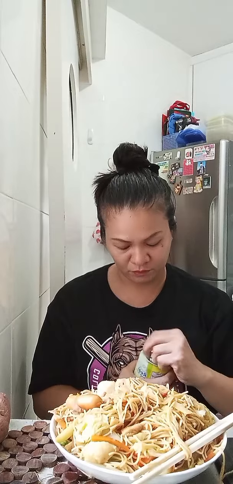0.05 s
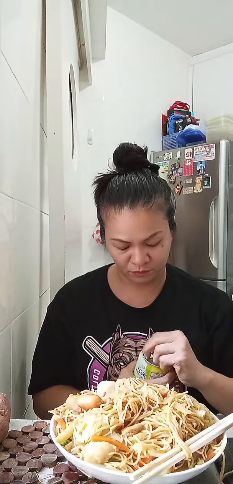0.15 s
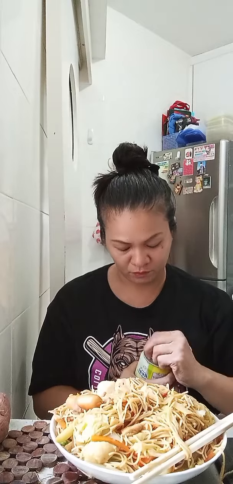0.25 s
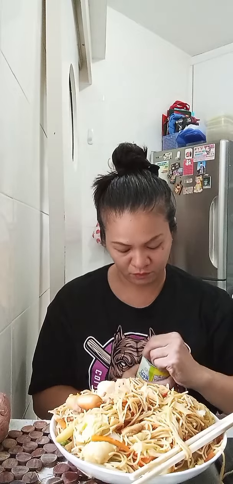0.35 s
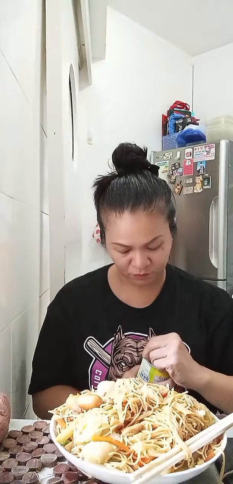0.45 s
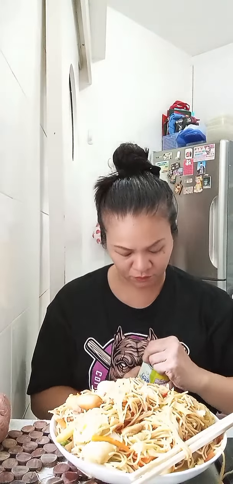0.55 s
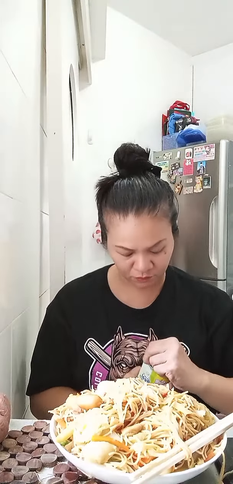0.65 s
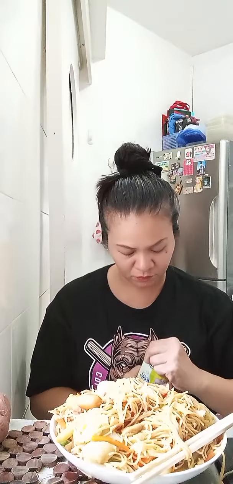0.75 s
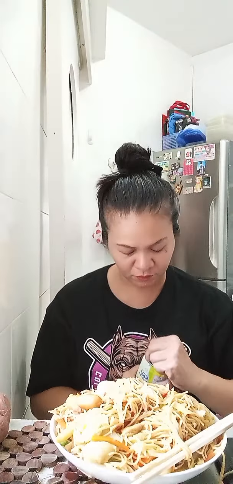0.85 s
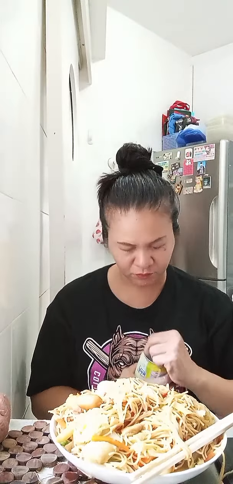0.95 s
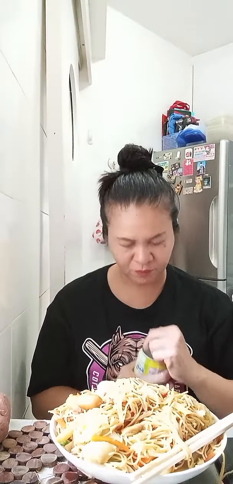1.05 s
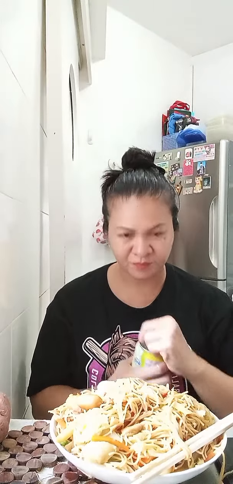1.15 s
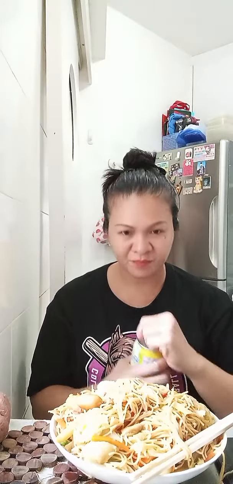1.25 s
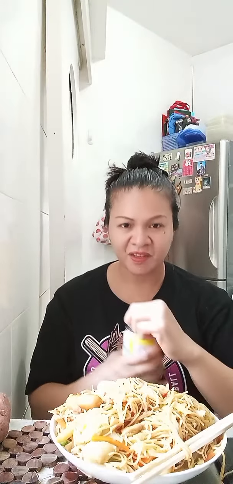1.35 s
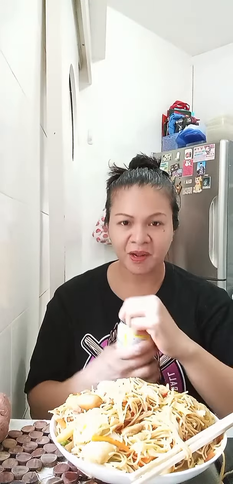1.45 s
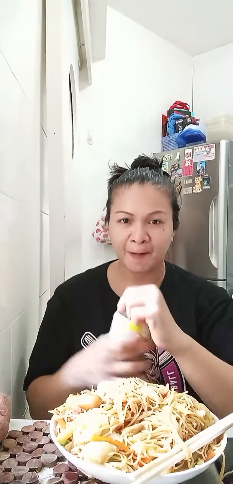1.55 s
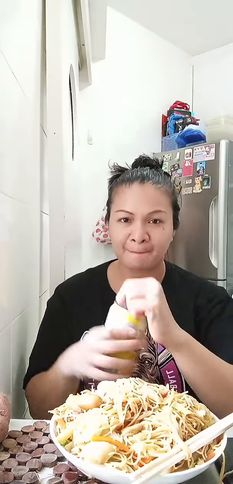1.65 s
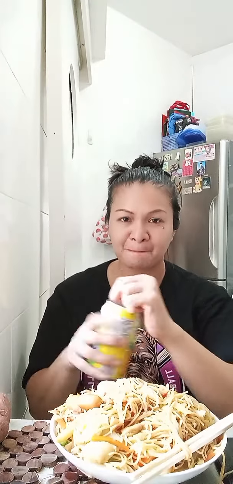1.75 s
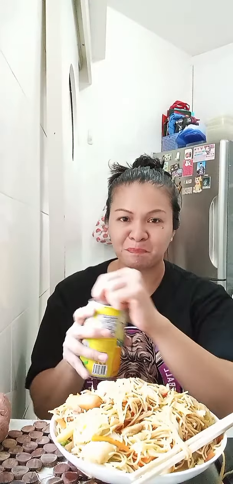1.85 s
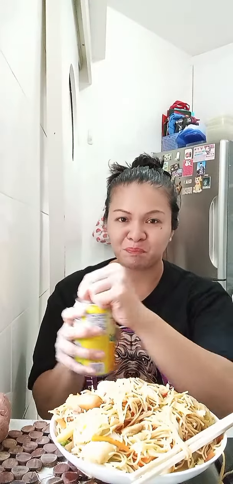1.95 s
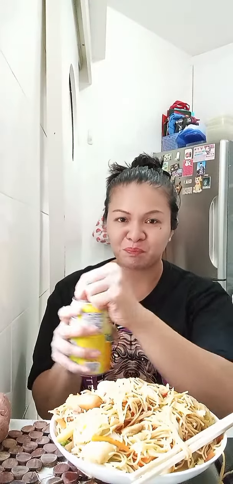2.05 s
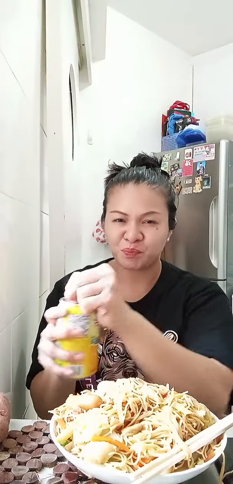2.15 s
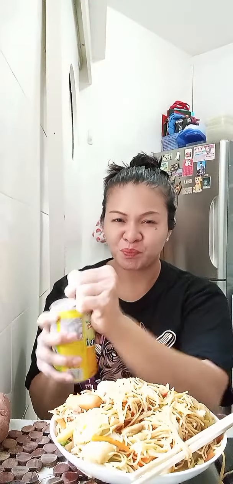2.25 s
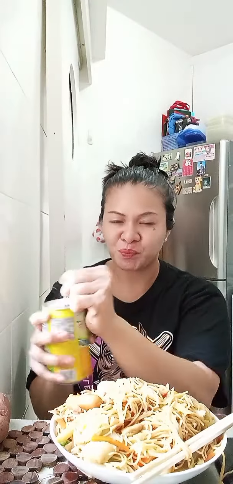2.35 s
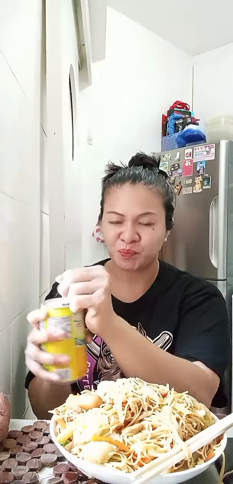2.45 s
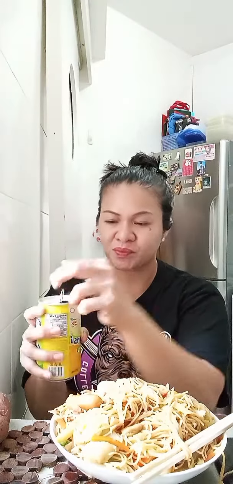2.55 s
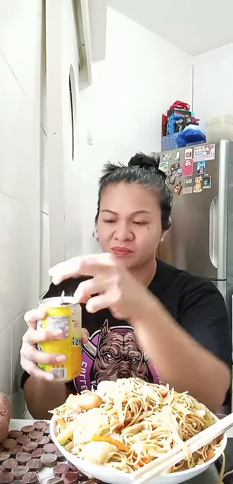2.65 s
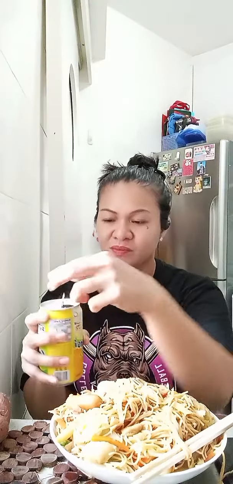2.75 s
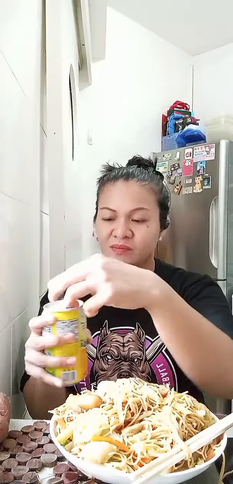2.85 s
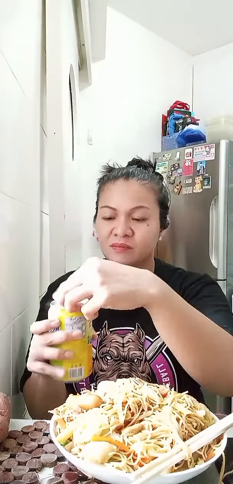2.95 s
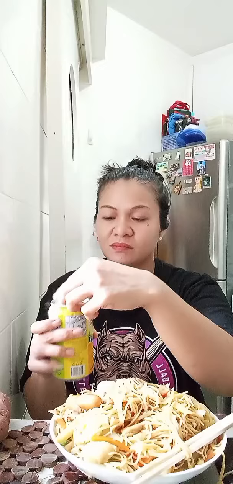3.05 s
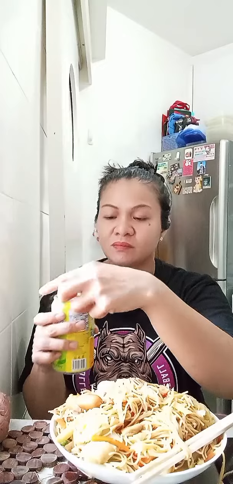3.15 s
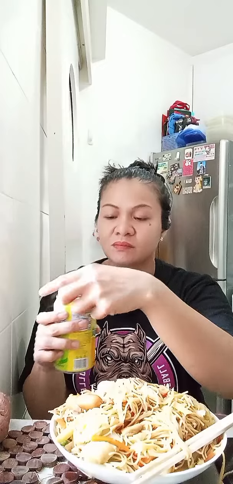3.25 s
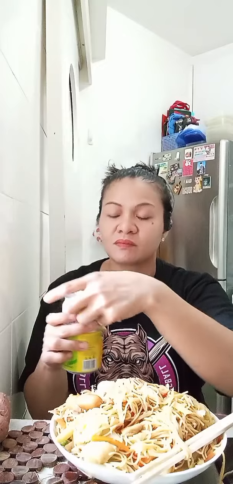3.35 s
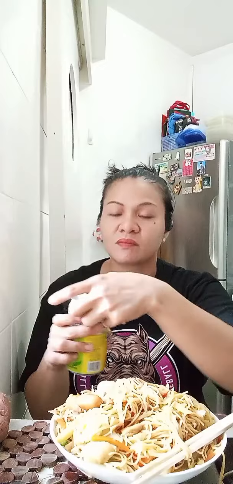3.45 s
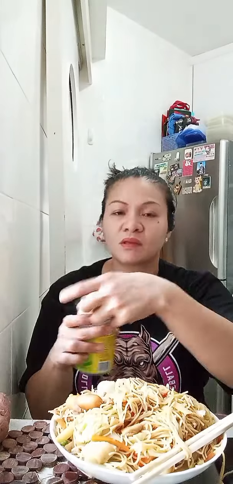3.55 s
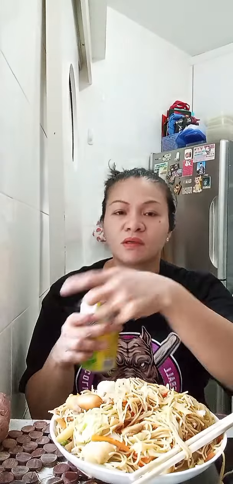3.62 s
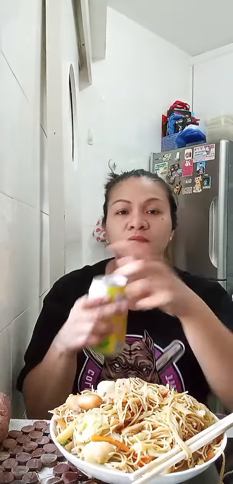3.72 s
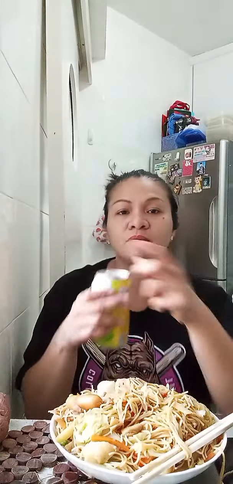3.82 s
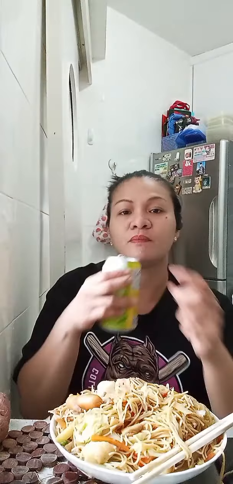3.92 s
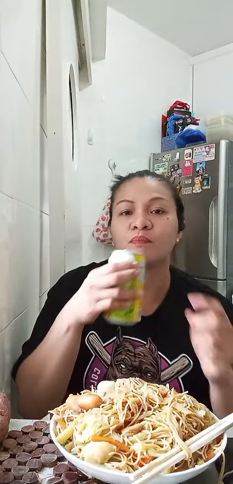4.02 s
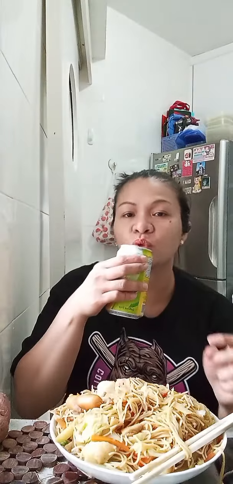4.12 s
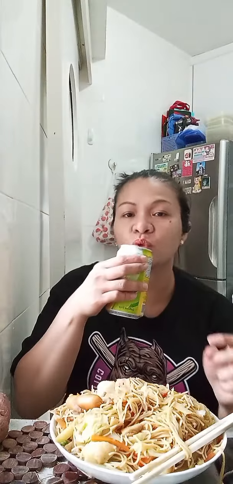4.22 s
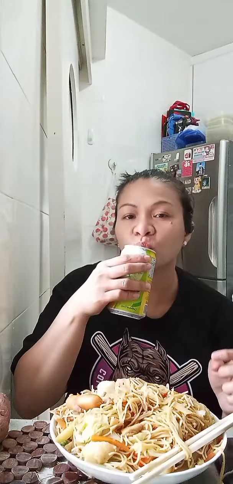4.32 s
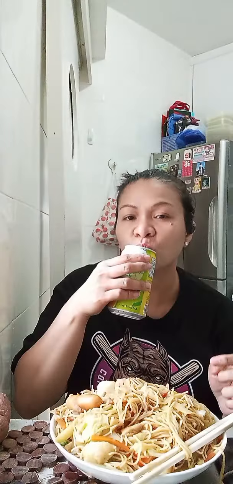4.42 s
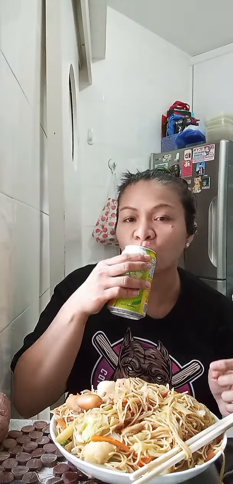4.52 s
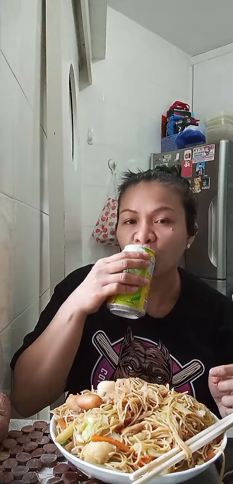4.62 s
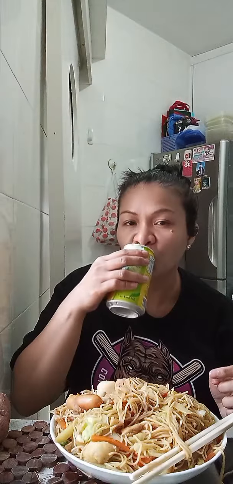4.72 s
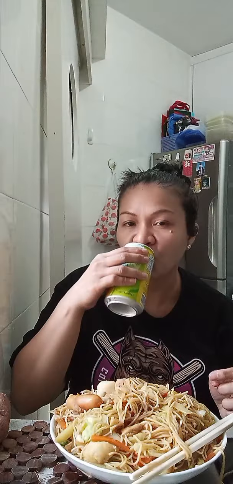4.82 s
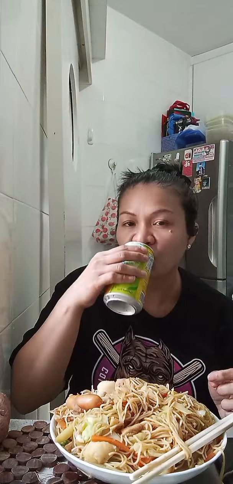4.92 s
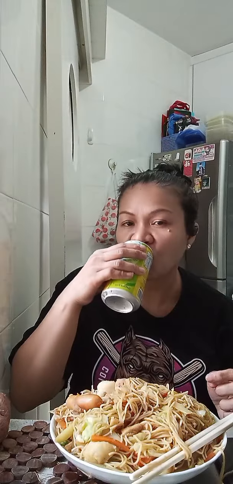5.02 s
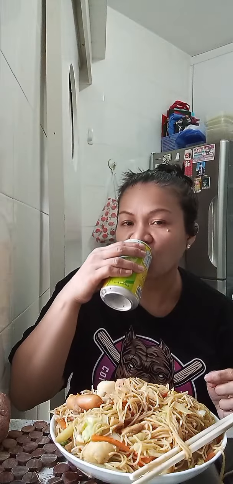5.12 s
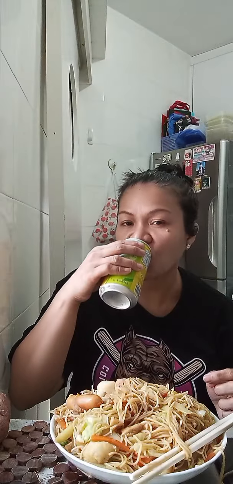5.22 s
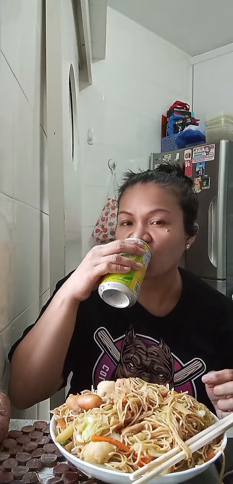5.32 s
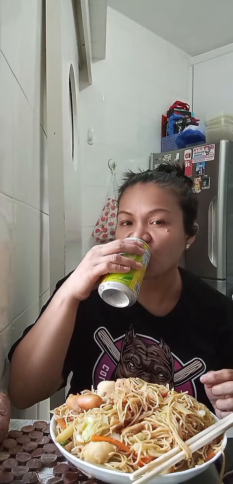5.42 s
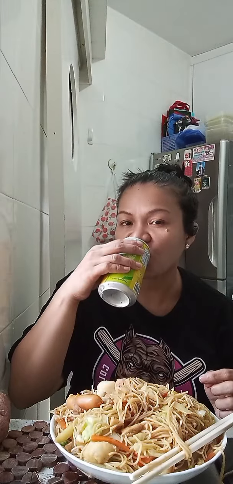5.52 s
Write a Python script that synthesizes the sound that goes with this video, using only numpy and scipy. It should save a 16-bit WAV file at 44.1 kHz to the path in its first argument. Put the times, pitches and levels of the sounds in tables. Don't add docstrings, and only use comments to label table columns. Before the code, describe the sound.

A pull-tab can opens close by: small crack and vent hiss, two sharp metal snaps, short gas spurt, tab click, then faint finger ticks.

```python
import sys
import numpy as np
from scipy import signal
from scipy.fft import rfft, irfft, next_fast_len
from scipy.io import wavfile
from scipy.ndimage import uniform_filter1d, map_coordinates

SR = 44100
rng = np.random.default_rng(int(sys.argv[2]) if len(sys.argv) > 2 else 0)


def magnitude_from_level(level_db):
    exponent = np.asarray(level_db, float) / 20
    return 10 ** exponent


def master_out(mix):
    frames = np.transpose(np.atleast_2d(mix))
    ceiling = np.clip(frames, -1, 1)
    pcm = np.round(ceiling * 32767).astype(np.int16)
    wavfile.write(sys.argv[1], SR, pcm)


N = 246078

# (time [s], blade pitch [Hz], blade tone level [dB])
FAN_TRACK = [(0.0, 96.5, -43), (0.12, 97.6, -49), (0.48, 97.6, -45), (0.64, 97.5, -55), (0.79, 97.7, -43),
             (1.26, 97.5, -51), (1.32, 97.6, -44), (2.08, 97.6, -47), (2.14, 97.5, -53), (2.27, 97.6, -41),
             (2.31, 97.7, -59), (2.38, 97.3, -48), (3.51, 99.0, -45), (3.65, 98.9, -49), (3.82, 98.9, -39),
             (3.87, 98.9, -44), (5.46, 98.9, -48), (5.58, 101.6, -45)]
# (multiple of blade pitch [1], level [dB])
BLADE_HARMONICS = [(1, -1), (2, -14.5), (3, -4.5), (4, -12), (5, -17), (6, -21)]
# (frequency [Hz], density [dB per Hz])
AIR_COLOUR = [(15, -51), (25, -26.5), (43, -30), (68, -15.5), (103, -4.5), (151, -6.5), (286, -6.5),
              (948, -18.5), (1290, -16.5), (2350, -34.5), (2940, -31), (3350, -34), (5000, -41),
              (6500, -68), (11000, -120)]
# (frequency [Hz], width [Hz], gain [dB])
HOUSING_BANDS = [(435, 20, 3.5), (808, 110, 8), (948, 110, -4), (1076, 88, 8), (1290, 97, 4),
                 (2000, 200, 7), (2934, 183, 13.5), (6020, 740, 9)]
AIR_DB = -43.5

# (time [s], length [s], level [dB])
STROKES = [
    (.08, .08, -71),
    (1.394, 0.11, -65.5),
    (3.08, .12, -67),
    (3.48, .14, -57.5),
    (3.665, 0.066, -62.5),
    (4.025, 0.056, -59.5),
    (4.9, 0.093, -63),
    (5.079, .07, -64),
    (5.199, 0.094, -67),
]
# (time [s], peak [dB], pitch [Hz])
NAIL_TICKS = [(.1416, -52, 4930), (.485, -62, 13040), (1.402, -58, 14500), (1.4222, -46, 13500),
              (1.4225, -48, 9800), (1.4465, -39.5, 7070), (1.5065, -47.5, 8000), (1.512, -47, 3150),
              (1.573, -53, 4300), (1.5798, -46, 4180), (1.581, -61, 10000), (2.59, -51, 6800),
              (3.08, -56, 7750), (3.609, -61, 9800), (3.642, -62, 14500), (3.745, -54, 14740),
              (4.163, -61, 14480), (5.2734, -42, 5000), (5.285, -48, 5400), (5.508, -50, 3780)]
# (time [s], peak [dB], pitch [Hz])
PAD_TICKS = [(.1, -60, 13000), (1.375, -61, 12000), (1.474, -58, 11010), (1.5045, -42, 3497),
             (1.5068, -48, 12400), (2.515, -53, 11940), (3.0674, -57, 8970), (3.4865, -48, 4500),
             (3.5418, -39, 3900), (3.543, -50, 8000), (3.5432, -57, 14000), (3.545, -42, 2500),
             (3.579, -56, 10000), (3.693, -54, 7000), (3.813, -62, 11000), (4.0287, -43, 6650),
             (4.96, -50, 4000), (5.11, -49.5, 4200), (5.2091, -47, 5200)]
NAIL_WIDTH, PAD_WIDTH = .21, .75
TICK_T60_S, TICK_HZ, DAMPING = .024, 5000, .6

# (time [s], level [dB])
SQUEAKS = [
    (.385, -61),
    (1.549, -54),
    (2.72, -64),
    (3.385, -61),
    (3.634, -56),
    (4.55, -56),
    (5.455, -55),
]
SQUEAK_S, SQUEAK_HZ, SQUEAK_SPREAD_HZ = .04, 7090, 40

# (opens [s], rise [s], peak [dB], hold [s], fall [dB per s], shut after [s])
VENT_FLOW = (.857, .016, -17.5, .026, 250, .16)
# (frequency [Hz], density [dB per Hz])
VENT_SPECTRUM = [(180, -64), (300, -26), (425, -8.5), (701, -18), (842, -13.5), (1560, -8), (1870, -7.5),
                 (2480, -12.5), (6300, -6.5), (7080, -3), (9550, -16), (14000, -11), (16000, -21.5)]
# (opens [s], rise [s], peak [dB], hold [s], fall [dB per s], shut after [s])
GAS_FLOW = (2.3, .003, -29, .085, 145, .215)
# (frequency [Hz], density [dB per Hz])
GAS_SPECTRUM = [(900, -38), (1500, -9), (2250, -2.5), (2600, -9.5), (3400, -8), (4800, -6), (6700, -3.5),
                (8300, -17), (10500, -23), (12300, -17), (14200, -19), (16000, -28)]
# (frequency [Hz], width [Hz], gain [dB])
SLIT_BANDS = [(3500, 250, 3), (4620, 300, 4), (5250, 230, 4), (7000, 340, 1), (8000, 400, 3)]
SPURT_DB, SPURT_S = 10, .018

# (time [s], peak [dB], rise [s], burst t60 [s], crack level [dB])
SNAP_EVENTS = [
    (2.2688, -4.5, .002, 0.075, -2),
    (2.3005, -5.5, .003, .045, 2.5),
    (2.3838, -2.5, 0.0013, .12, -1),
    (.859, -14, .004, .03, -17),
]
FREE_RING_S = [
    .021,
    .015,
    .135,
    .125,
    .051,
]
# (frequency [Hz], level [dB], t60 [s])
SEALED_MODES = [(1920, -2.5, 0.15), (2145, -5, 0.11), (3260, -6, .04), (4150, -4, .05), (4530, 3, 0.042),
                (5280, -3, 0.035), (5520, 4, 0.045), (6740, -6, 0.034), (8860, -11, .02), (14730, -9, .02)]
# (frequency [Hz], level [dB], t60 [s])
TORN_MODES = [(910, -2, .04), (1300, -14, .04), (2340, -16, .04), (3280, -16, .02), (4320, -16, .02),
              (5520, 2, 0.037), (6790, 3, 0.025), (12200, -6, .01), (14500, -8, .01)]
# (frequency [Hz], level [dB], t60 [s])
OPEN_MODES = [(332, -5.5, 0.13), (449, -5, .14), (654, -2, .22), (718, 0.5, 0.15), (851, -2, 0.18),
              (940, 1, 0.095), (1330, -1, 0.11), (1680, -2.5, 0.18), (1950, 0.5, 0.32), (2030, -3.5, 0.27),
              (2180, -6, 0.22), (3014, -5, 0.25), (3200, -5.5, 0.3), (3380, -8, 0.2)]
# (frequency [Hz], level [dB], t60 [s])
RIVET_MODES = [(326, -21, 0.053), (1660, -3.5, 0.078), (1816, -5.5, 0.27), (1910, -11, .15),
               (4570, 7, 0.04), (5400, -4, .06), (7000, 1, .08)]
# (frequency [Hz], density [dB per Hz])
SEALED_CRACK = [(350, -66.5), (600, -36), (1400, -9), (1980, -1), (2910, -17), (4050, -4), (5480, -6.5),
                (6120, -15), (6640, -16), (8270, -22), (14900, -25), (16000, -34)]
# (frequency [Hz], density [dB per Hz])
TEAR_CRACK = [(240, -64), (400, -34), (935, -1), (1330, -9), (2320, -2), (2970, -23), (5600, 2),
              (9470, -22), (13500, -16), (16000, -27)]
# (frequency [Hz], density [dB per Hz])
FOLD_CRACK = [(90, -53), (150, -25), (821, -3), (1530, -4.5), (1980, 0), (2600, -11), (3420, -7),
              (3840, -14), (7040, -15), (10000, -30), (13500, -25), (16000, -34)]

# (time [s], peak [dB], push [s])
POP_EVENTS = [
    (2.3188, -8, 0.00019),
]
# (frequency [Hz], level [dB], t60 [s])
CAVITY_MODES = [(802, -5, 0.48), (883, -1, 0.36), (969, -1, 0.33), (703, -6, .3), (1090, -3.5, 0.12),
                (1308, -6, 0.22)]

# (frequency [Hz], t60 [s])
KITCHEN_T60 = [(300, 0.31), (2000, 0.39), (6000, 0.36), (14000, 0.27)]
# (frequency [Hz], density [dB per Hz])
CAPSULE_COLOUR = [(2500, -11), (4200, -5.5), (4900, -1.5), (5400, -2), (6100, 5), (6600, 0), (7100, -1.5),
                  (8200, -13.5), (11000, -16), (12300, -16), (13200, -9), (15000, -15), (16000, -17)]


def unit(x):
    return x / np.sqrt(np.mean(x ** 2) + 1e-20)


def along(points, hz):
    f, v = np.transpose(points)
    return np.interp(np.log(hz + 1), np.log(f + 1), v)


def curves(rows):
    s, *cols = np.transpose(rows)
    return [np.interp(np.arange(N) / SR, s, c) for c in cols]


def wobble(rate_hz):
    knots = rng.standard_normal(int(N * rate_hz / SR) + 4)
    return map_coordinates(knots, [np.arange(N) * rate_hz / SR])


def filtered(x, response):
    m = next_fast_len(x.shape[-1] + SR // 2)
    spectrum = rfft(x, m) * response(np.fft.rfftfreq(m, 1 / SR))
    return irfft(spectrum, m)[..., :x.shape[-1]]


def resonance(f, hz, width_hz):
    return 1j * f * width_hz / (hz * hz - f * f + 1j * f * width_hz)


def bumps(bands, f):
    return sum(db / (1 + (2 * (f - hz) / width_hz) ** 2) for hz, width_hz, db in bands)


def burst(rise_s, t60_s, size):
    t = np.arange(size) / SR
    return np.clip(t / rise_s, 0, 1) * magnitude_from_level(-60 * t / t60_s) * rng.standard_normal(size)


def add(track, s, sound, db):
    track[round(s * SR):][:len(sound)] += magnitude_from_level(db) * sound / np.abs(sound).max()


def patchy(patchy_db):
    z = signal.stft(rng.standard_normal(N + 512), nperseg=512)[2]
    field = uniform_filter1d(rng.standard_normal(z.shape), size=5, axis=0)
    field = uniform_filter1d(field, size=12, axis=1)
    return signal.istft(z * magnitude_from_level(patchy_db * unit(field)), nperseg=512)[1][:N]


def fan():
    pitch_hz, tone_db = curves(FAN_TRACK)
    turn = 2 * np.pi * np.cumsum(pitch_hz) / SR
    mean_db = tone_db.mean()
    swell_db = tone_db - mean_db
    tones = np.zeros(N)
    for k, db in BLADE_HARMONICS:
        waver_db = 2.4 * np.sqrt(1 - .8 / k) * wobble(9)
        level_db = db + 4 + swell_db / k ** 2 + waver_db
        tones += magnitude_from_level(level_db) * np.sin(k * turn + 0.54 * wobble(7))
    air = unit(filtered(patchy(patchy_db=1.7),
                        lambda f: magnitude_from_level(along(AIR_COLOUR, f) + bumps(HOUSING_BANDS, f))))
    air_db = AIR_DB + 0.69 * wobble(6.01) + .4 * wobble(1.5)
    return magnitude_from_level(mean_db) * tones + magnitude_from_level(air_db) * air


def capsule():
    return magnitude_from_level(-65.5) * unit(filtered(rng.standard_normal(N),
                                      lambda f: magnitude_from_level(along(CAPSULE_COLOUR, f) - 60 * (f < 1500))))


def rustle():
    t = np.arange(N) / SR
    stroke = sum(magnitude_from_level(db) * np.sin(np.pi * np.clip((t - s) / length_s, 0, 1) ** 0.62)
                 for s, length_s, db in STROKES)
    grain = magnitude_from_level(3.4 * wobble(500)) * rng.standard_normal(N)
    return stroke * unit(filtered(
        grain, lambda f: resonance(f, 3960, 3600) ** 2 * resonance(f, 4500, 7000) ** 2))


def ticks():
    out = np.zeros(N + SR)
    for contacts, width in (NAIL_TICKS, NAIL_WIDTH), (PAD_TICKS, PAD_WIDTH):
        for s, db, hz in contacts:
            tap = burst(.001, TICK_T60_S * (TICK_HZ / hz) ** DAMPING, size=SR // 8)
            add(out, s, filtered(tap, lambda f: resonance(f, hz, width * hz) ** 3), db)
    return out[:N]


def bearing():
    out = np.zeros(N + SR)
    t = np.arange(round(SQUEAK_S * SR)) / SR
    swell = np.hanning(len(t))
    for s, db in SQUEAKS:
        hz = SQUEAK_HZ + SQUEAK_SPREAD_HZ * rng.standard_normal()
        phase = 2 * np.pi * hz * t + 0.062 * np.cumsum(rng.standard_normal(len(t)))
        octave = np.sin(2 * phase + 0.15 * np.cumsum(rng.standard_normal(len(t))))
        add(out, s, np.sqrt(swell) * (np.sin(phase) + .3 * swell * octave), db)
    return out[:N]


def jet(flow, colour, spit_db, spurt_db):
    opens_s, rise_s, peak_db, hold_s, fall_db_per_s, shut_s = flow
    t = np.clip(np.arange(N) / SR - opens_s, 0, None)
    level_db = peak_db - fall_db_per_s * np.clip(t - hold_s, 0, None)
    level_db = level_db + spurt_db * np.exp(-(t / SPURT_S) ** 2)
    gate = np.sqrt(np.clip(t / rise_s, 0, 1)) * np.clip((shut_s - t) / 0.041, 0, 1)
    spit = magnitude_from_level(spit_db * wobble(600)) * rng.standard_normal(N)
    hiss = unit(filtered(spit, lambda f: magnitude_from_level(along(colour, f) + bumps(SLIT_BANDS, f))))
    return gate * magnitude_from_level(level_db) * hiss


def ringing(modes, rise_s, free_s, rough_db, drift_rad):
    t = np.arange(SR // 2) / SR
    ring = np.zeros(len(t))
    for hz, db, t60_s in modes:
        level_db = db - 60 * t / t60_s + rough_db * wobble(147)[:len(t)]
        phase = 2 * np.pi * (hz * t + rng.random()) + drift_rad * wobble(119)[:len(t)]
        ring += magnitude_from_level(level_db) * np.sin(phase)
    damped = magnitude_from_level(-12 * np.clip((t - free_s) * 250, 0, 1))
    ring = ring * (1 - np.exp(-t / rise_s)) * damped
    return ring / np.abs(ring).max()


def snaps():
    out = np.zeros(N + SR)
    cans = [(SEALED_MODES, SEALED_CRACK), (TORN_MODES, TEAR_CRACK),
            (OPEN_MODES, FOLD_CRACK), (RIVET_MODES, SEALED_CRACK)]
    for event, free_s, (modes, colour) in zip(SNAP_EVENTS, FREE_RING_S, cans):
        s, db, rise_s, t60_s, crack_db = event
        ring = ringing(modes, rise_s, free_s, rough_db=4.5, drift_rad=1.0)
        crack = filtered(burst(rise_s, t60_s, size=SR // 2), lambda f: magnitude_from_level(along(colour, f)))
        add(out, s, ring + magnitude_from_level(crack_db) * crack / np.abs(crack).max(), db)
    return out[:N]


def pop():
    out = np.zeros(N + SR)
    for s, db, push_s in POP_EVENTS:
        u = np.arange(SR // 2) / SR / push_s
        push = u * (2 - u) * np.exp(-u)
        blow = filtered(push, lambda f: resonance(f, 1070, 970) ** 2)
        swing = ringing(CAVITY_MODES, 0.0012, FREE_RING_S[-1], rough_db=3, drift_rad=1.0)
        add(out, s, 0.68 * swing - blow / np.abs(blow).max(), db)
    return out[:N]


def kitchen(x):
    hz, t, z = signal.stft(rng.standard_normal(SR // 2), SR, nperseg=256)
    decay = magnitude_from_level(-60 * t / along(KITCHEN_T60, hz)[:, None])
    tail = signal.istft(z * decay, SR, nperseg=256)[1]
    delayed = np.pad(x, (150, 0))
    return signal.fftconvolve(delayed, tail / np.linalg.norm(tail))[:N]


def scene():
    vent = jet(VENT_FLOW, VENT_SPECTRUM, spit_db=1.5, spurt_db=0)
    gas = jet(GAS_FLOW, GAS_SPECTRUM, spit_db=3.2, spurt_db=SPURT_DB)
    hiss = vent + gas
    small = ticks() + rustle()
    cracks = snaps() + pop()
    room = magnitude_from_level(-13.5) * kitchen(hiss) + magnitude_from_level(-11) * kitchen(cracks) + magnitude_from_level(-4.5) * kitchen(small)
    return np.tile(hiss + cracks + small + room + bearing() + fan() + capsule(), (2, 1))


def band_limit(x):
    return signal.sosfilt(signal.butter(12, 16650, fs=SR, output="sos"), x)


def record(dry):
    keep = np.exp(-1 / (0.048 * SR))
    loudness = signal.lfilter([1 - keep], [1, -keep], np.abs(dry))
    ducked = dry / (1 + loudness / 0.2)
    rounded = ducked / (1 + np.abs(ducked / .75) ** 4) ** (1 / 4)
    limited = filtered(rounded, lambda f: magnitude_from_level(-np.clip(f - 15900, 0, 2400) / 24))
    return band_limit(limited)


dry = scene()
out = record(dry)
master_out(out)
```